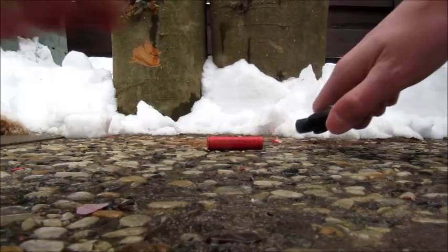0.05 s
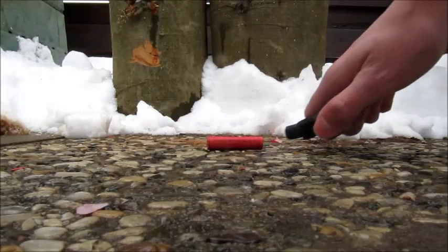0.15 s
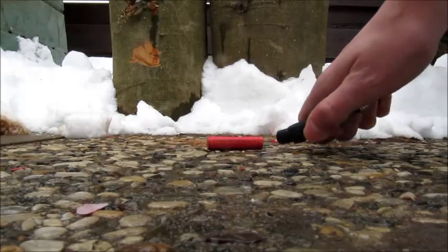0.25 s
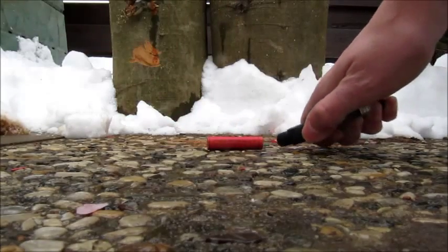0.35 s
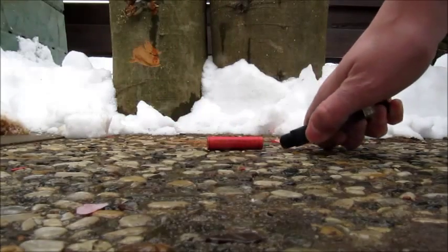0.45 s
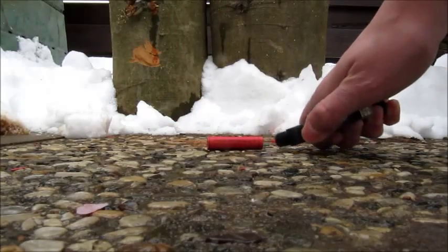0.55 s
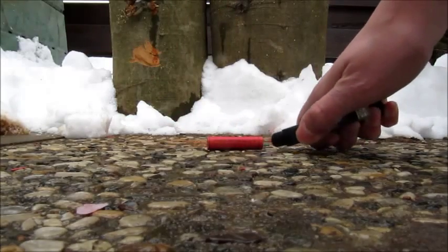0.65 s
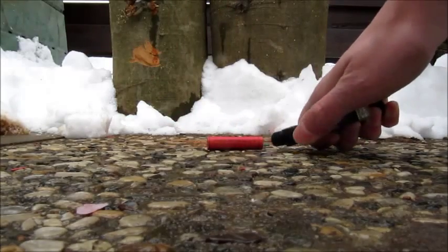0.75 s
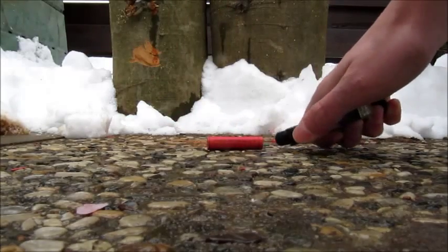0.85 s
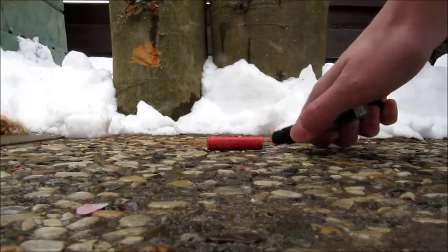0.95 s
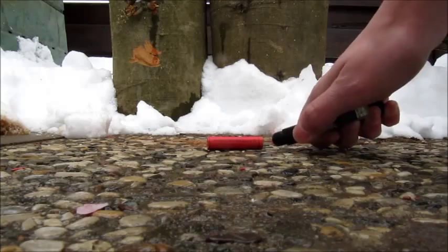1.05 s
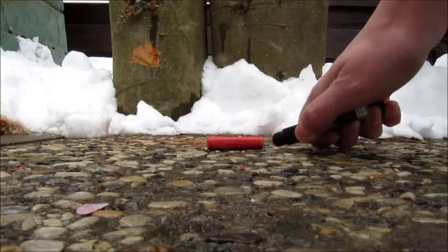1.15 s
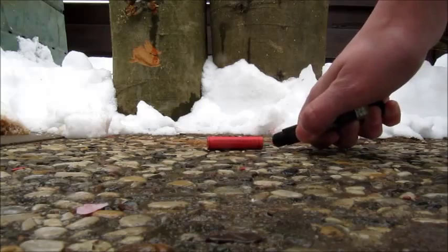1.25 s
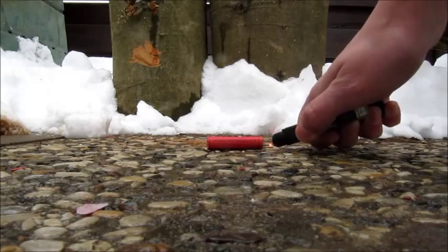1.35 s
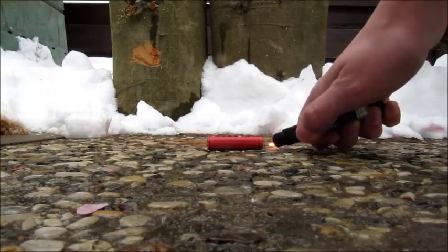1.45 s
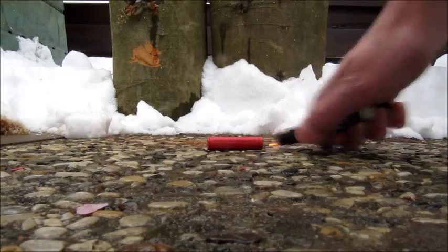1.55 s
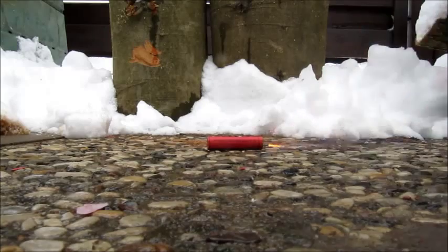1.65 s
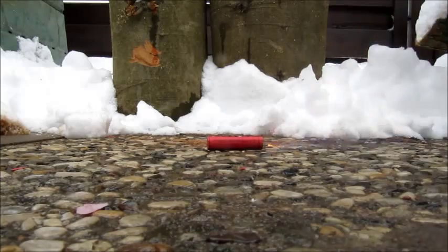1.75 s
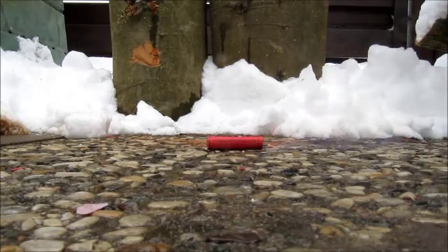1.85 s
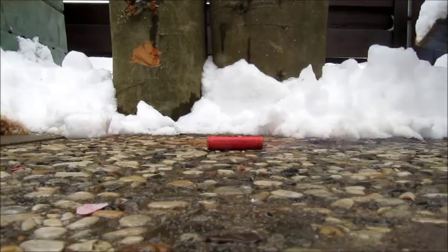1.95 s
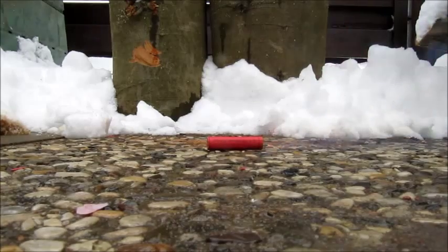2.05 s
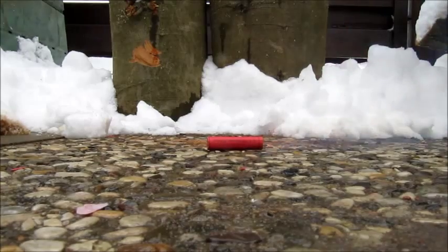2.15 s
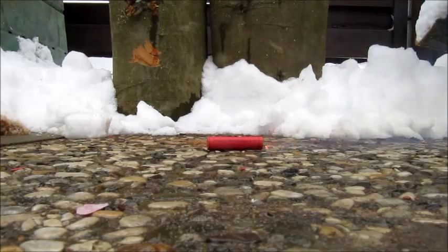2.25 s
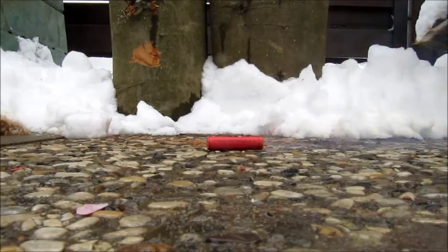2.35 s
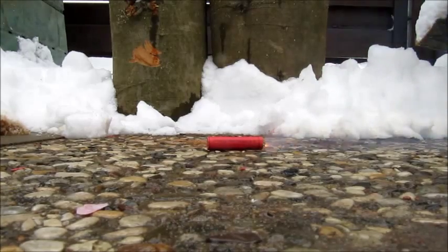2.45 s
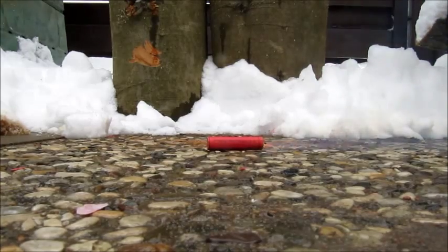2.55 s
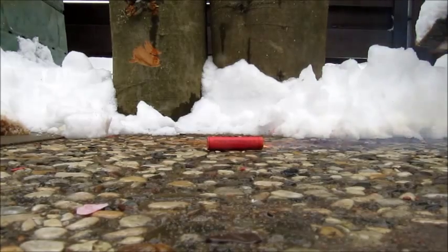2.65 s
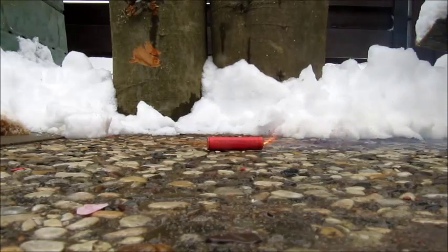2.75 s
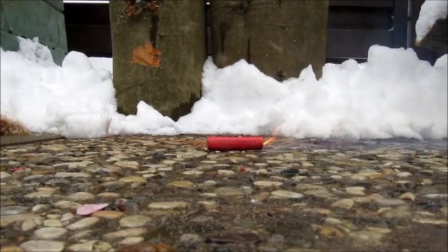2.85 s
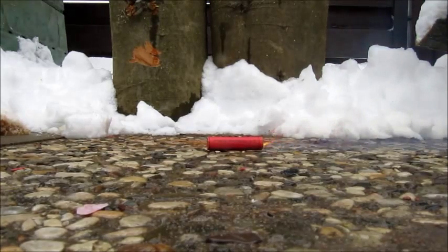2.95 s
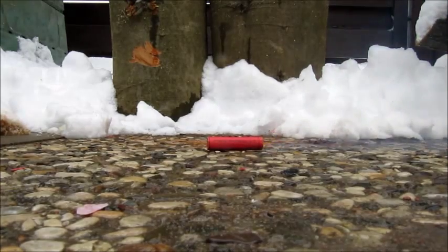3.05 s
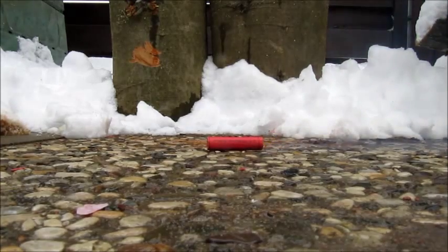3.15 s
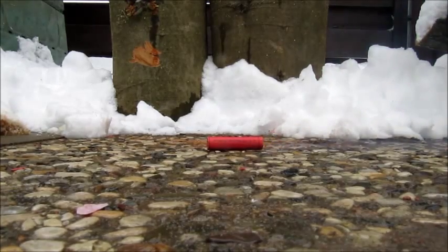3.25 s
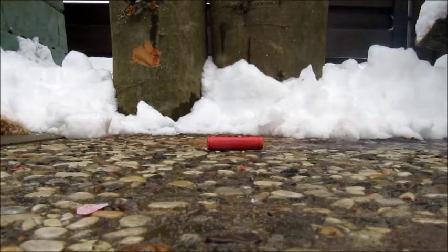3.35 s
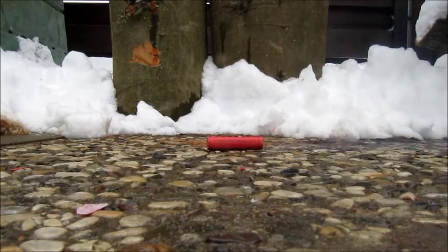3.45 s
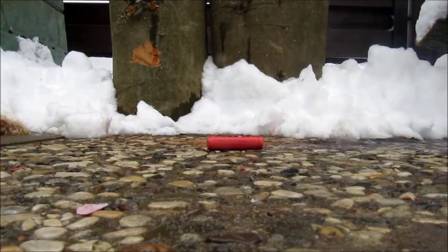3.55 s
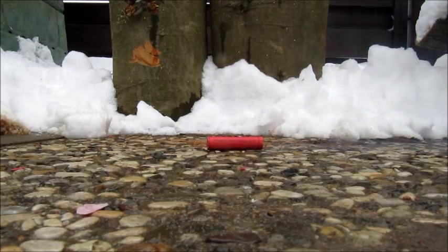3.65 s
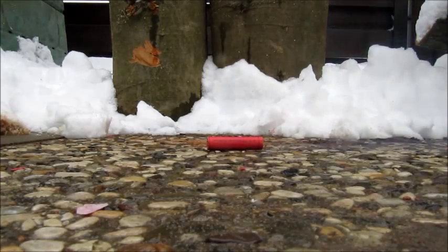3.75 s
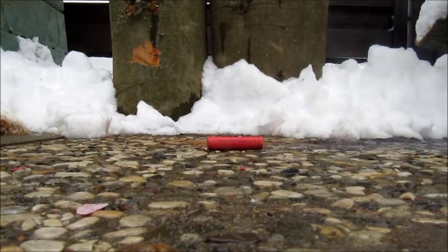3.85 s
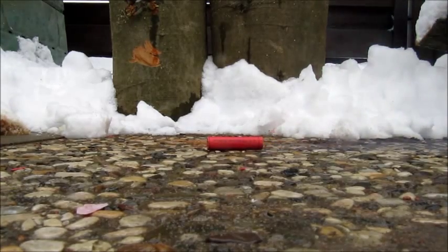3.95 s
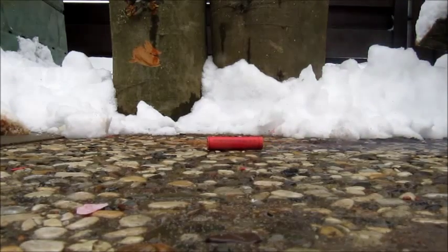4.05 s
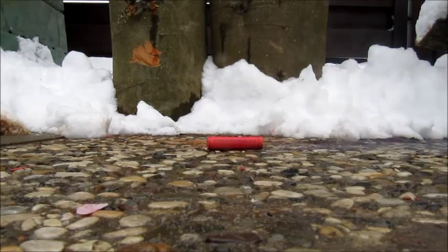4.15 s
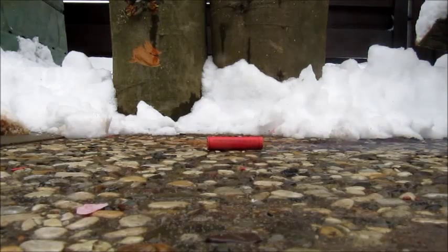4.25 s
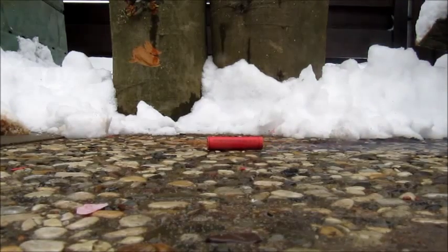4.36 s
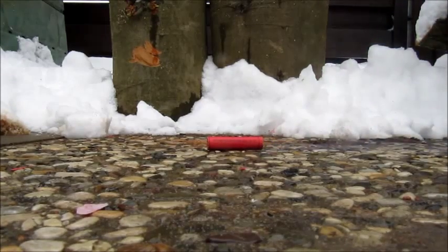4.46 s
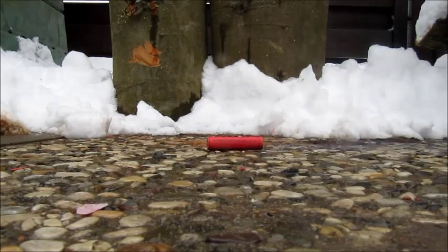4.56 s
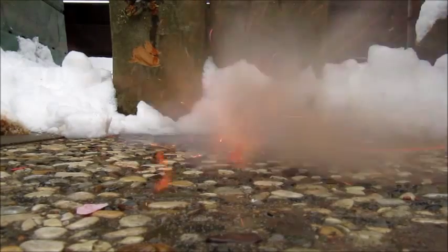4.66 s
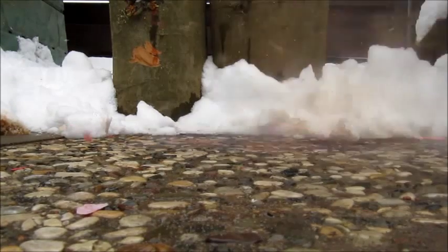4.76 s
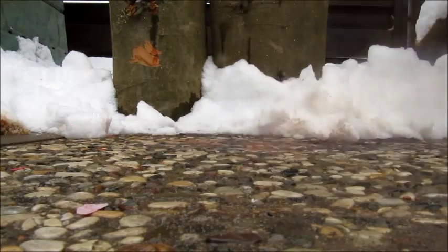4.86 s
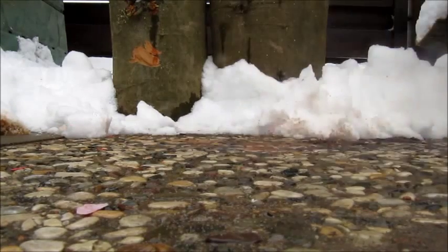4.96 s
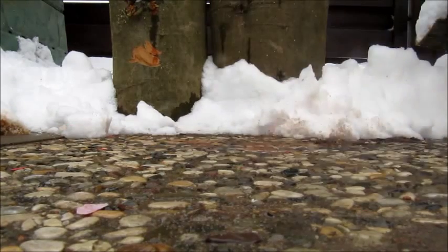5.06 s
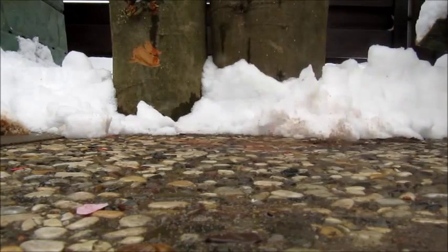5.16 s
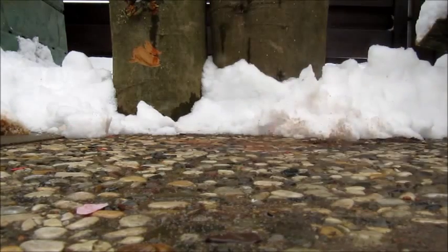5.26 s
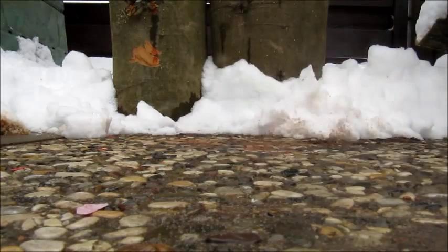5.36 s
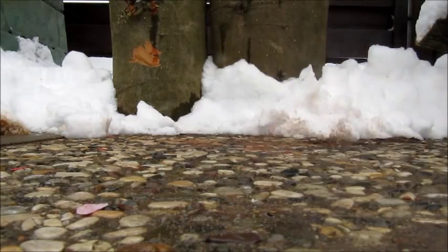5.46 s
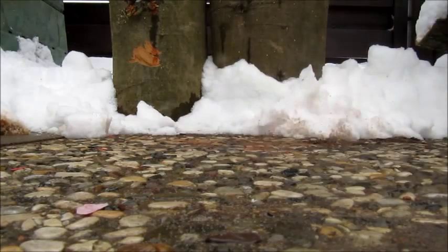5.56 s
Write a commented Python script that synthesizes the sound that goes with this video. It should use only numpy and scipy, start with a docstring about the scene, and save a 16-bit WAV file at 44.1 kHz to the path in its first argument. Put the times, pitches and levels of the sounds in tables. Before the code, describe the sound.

Lighter clicks and a sputtering, hissing fuse lead to a brief hush, a loud firecracker bang and a few ticks of falling grit.

```python
"""Firecracker in a snowy yard

Close on a pebbled path in a fenced yard, heard through a small camera's microphone, wind buffeting it.
A gas lighter hisses and snaps until it lights; the fuse sputters, burns into the tube and goes quiet.
The charge bangs, fence and houses throw it back, and grit falls on the stones.
The bang and the lighter's snaps overload the microphone and duck its gain."""
import sys
import numpy as np
from scipy import signal
from scipy.fft import rfft, irfft
from scipy.io import wavfile
from scipy.ndimage import uniform_filter1d, map_coordinates

SR = 44100
rng = np.random.default_rng(int(sys.argv[2]) if len(sys.argv) > 2 else 0)


def unload_audio(sound):
    """Save the sound as a 16-bit wav file, at the path given as the first command line argument."""
    columns = np.transpose(np.atleast_2d(sound))
    # keep every value between -1 and 1, then stretch to whole-number steps
    steps = np.round(np.clip(columns, -1, 1) * 32767)
    wavfile.write(sys.argv[1], SR, steps.astype(np.int16))


N = 247519
TIME = np.arange(N) / SR
BANG_S = 4.6863


def amp(db):
    """Decibels to gain."""
    return 10 ** (np.asarray(db) / 20)


def unit(x):
    """Scales to rms 1."""
    return x / np.sqrt(np.mean(x ** 2) + 1e-20)


def level(rows):
    """Gain over time from a curve of (seconds, dB) points."""
    return amp(np.interp(TIME, *np.transpose(rows)))


def dying(t, t60):
    """Exponential decay from t = 0, down 60 dB after t60 seconds."""
    return amp(-60 * t / t60)


def gate(on_s, attack_s, off_s, t60):
    """Straight attack, hold, exponential release."""
    return np.clip((TIME - on_s) / attack_s, 0, 1) * dying(np.maximum(TIME - off_s, 0), t60)


def settle(start_s, time_s):
    """Goes from 0 to 1 after start_s, fast at first."""
    return 1 - np.exp(-np.maximum(TIME - start_s, 0) / time_s)


def swell(s, half_s):
    """A bell-shaped rise and fall of height 1, centred on time s."""
    return np.exp(-((TIME - s) / half_s) ** 2)


def swells(rows):
    """Gain over time from a sum of bells, each given by centre, dB and half length."""
    return sum(amp(db) * swell(s, half_s) for s, db, half_s, *_ in rows)


def add(mix, s, sound):
    """Mixes a sound in at time s."""
    part = mix[max(round(s * SR), 0):][:len(sound)]
    part += sound[:len(part)]


def colour(x, points, tilt_db=0, size=4096):
    """Minimum-phase filter of unit energy through (Hz, dB) points, tilted per octave above 500 Hz."""
    octave = np.log2(abs(np.fft.fftfreq(size, 1 / SR)) + 1)
    hz, db = np.transpose(points)
    db = np.interp(octave, np.log2(hz), db) + tilt_db * np.maximum(octave, np.log2(500))
    log_gain = np.log(amp(db - db.max()))
    taps = np.fft.ifft(np.exp(np.conj(signal.hilbert(log_gain)))).real
    return signal.oaconvolve(x, taps / np.linalg.norm(taps))[:len(x)]


def resonate(x, hz, width_hz):
    """A resonance that follows the curve hz: shift down to zero, smooth twice, shift back."""
    turn = np.exp(2j * np.pi * np.cumsum(hz) / SR)
    pole = np.exp(-np.pi * width_hz / SR)
    return (turn * signal.lfilter([1], [1, -2 * pole, pole * pole], x / turn)).real


def noise(points):
    """Steady noise of rms 1 with the given spectrum."""
    return colour(rng.standard_normal(N), points)


def waver(db, per_s):
    """A gain that wanders at random by db rms, with per_s turning points a second."""
    knots = rng.standard_normal(N // 8)
    return amp(db * unit(map_coordinates(knots, [TIME * per_s], order=1)))


def grains(per_s, spread_db):
    """Random clicks of very uneven size, rms 1."""
    size = amp(spread_db * np.minimum(rng.exponential(1, N), 5))
    return unit(size * rng.choice([-1, 1], N) * (rng.random(N) < per_s / SR))


def overload(x, ceiling):
    """Flattens peaks at the ceiling with a firm knee."""
    return x / np.sqrt(np.cbrt(1 + (x / ceiling) ** 6))


def air():
    """Faint outdoor air all round the yard."""
    # Its spectrum. Each row: frequency in Hz, level in dB.
    air_spectrum = [(30, 6.5), (200, -6.5), (800, -6), (1500, -10.5), (2500, -13), (6000, -13.5),
                    (9200, -12.5), (12000, -21.5), (15700, -25)]
    return amp(-57.5) * noise(air_spectrum) * waver(db=1.1, per_s=6.5)


def wind(puff_db=10):
    """Low buffeting on the microphone; gusts have a puff at the core, and strong ones shed eddies."""
    # Strength of the breeze. Each row: time in seconds, level in dB.
    breeze_curve = [(0, -39), (.38, -42), (.5, -45.5), (.9, -41.5), (1.3, -49), (2.0, -51), (2.75, -48),
                    (2.92, -43.5), (3.17, -44.5), (3.26, -34), (3.47, -33.5), (3.57, -41), (3.9, -40.5),
                    (4.28, -60), (4.8, -49), (5.25, -51), (5.6, -45)]
    # Gusts. Each row: centre in seconds, level in dB, half length and the puff's half width in seconds.
    gusts = [(0.0505, -24, .012, 0.0022), (0.0866, -21, .03, .0018), (.1241, -32, .015, .0007),
             (.296, -44, .03, .0015), (.6, -37.5, .025, .001), (0.669, -34.5, 0.021, 0.0023),
             (.89, -41, .035, .0022), (.965, -37, 0.011, 0.0028), (1.72, -42, .012, 0.0032),
             (2.994, -38, 0.029, 0.0009), (3.262, -33, .02, .0008), (3.305, -34.5, .02, .0006),
             (3.503, -35.5, .012, 0.0014), (3.62, -40, .04, .0015), (3.722, -41, .015, .0014),
             (3.81, -39, 0.027, .0011), (3.954, -42, .015, .0017), (4.139, -37, 0.038, 0.0013),
             (4.369, -50, .03, 0.0039), (4.481, -52.5, 0.022, .003), (4.885, -34, 0.0093, .0026)]
    # Spectra of the buffeting and of the smaller, higher eddies. Each row: frequency in Hz, level in dB.
    buffet_spectrum = [(15, -2), (40, 5), (80, 1), (140, -5.5), (220, -13), (350, -23.5), (700, -42.5),
                       (2000, -71.5)]
    eddy_spectrum = [(60, -12.5), (150, 4.5), (280, -3), (450, -11), (800, -27), (2000, -59.5)]
    breeze = level(breeze_curve) * waver(db=2.5, per_s=16)
    force = np.minimum(np.hypot(breeze, swells(gusts)), amp(-31)) * waver(db=1.7, per_s=45)
    breakup = np.minimum(force / amp(-33), 1)
    eddies = amp(-6) * breakup * noise(eddy_spectrum) * waver(db=2.5, per_s=110)
    buffet = amp(-1 - 2.7 * breakup) * noise(buffet_spectrum)
    out = force * (buffet + eddies)
    t = np.arange(SR // 20) / SR
    for s, db, _, width in gusts:
        u = (t - t.mean()) / width
        puff = u * np.exp((1 - u ** 2) / 2)
        add(out, s - t.mean(), amp(db + puff_db) * puff)
    return out


def sleeve():
    """Soft cloth noise that comes and goes as the hands move near the microphone."""
    # Hand movements. Each row: centre in seconds, level in dB, half length in seconds.
    movements = [(.05, -54, .1), (.33, -57, .08), (.88, -56, .08), (1.15, -58, .08)]
    # The cloth's spectrum. Each row: frequency in Hz, level in dB.
    cloth_spectrum = [(300, 0), (900, 0), (1600, -6), (3000, -7), (6000, -13), (15000, -26)]
    return noise(cloth_spectrum) * swells(movements) * waver(db=1.5, per_s=70)


def gas(on_s, lit_s):
    """Gas hisses and softly whistles through the lighter's nozzle, dying away once it is alight."""
    # The whistle's pitch. Each row: time in seconds, frequency in Hz.
    whistle_curve = [(.14, 8570), (.25, 9000), (.41, 9500), (.55, 9800), (.9, 9260), (1.22, 9500)]
    # The hiss around the whistle. Each row: frequency in Hz, level in dB.
    nozzle_spectrum = [(500, -13.5), (2000, -19.5), (3300, -15), (4150, -5), (5100, -16), (6150, -18.5),
                       (6900, -5.5), (7800, -9.5), (8800, -1.5), (9700, -3), (10700, -9), (12000, -18.5),
                       (15700, -35)]
    whistle_hz = np.interp(TIME, *np.transpose(whistle_curve))
    whistle = unit(resonate(rng.standard_normal(N), whistle_hz, width_hz=1300))
    sag_db = -2 * settle(on_s, .2)  # the flow weakens as the nozzle cools
    flow = amp(-39.5 + sag_db) * gate(on_s, .034, lit_s, t60=.16)
    return (amp(-2.5) * noise(nozzle_spectrum) + amp(-3) * whistle) * flow * waver(db=.68, per_s=40)


def flame(lit_s, grow_s, off_s, low_db=-29.5, high_db=-20.5):
    """A fluttering flame swells and hisses more as the fuse tip heats, until the trigger is let go."""
    # The flame's low roar and the hiss above it. Each row: frequency in Hz, level in dB.
    roar_spectrum = [(150, -15), (550, -3.5), (1300, -2), (2800, 1.5), (4200, -2), (5800, -9), (6900, -6),
                     (9000, -15), (10700, -11), (15700, -34)]
    hiss_spectrum = [(2000, -23), (4000, -7.5), (5800, -11.5), (6900, -0.5), (8800, -6), (10700, 1.5),
                     (12200, -8.5), (14000, -16.5), (15700, -32)]
    heat_db = low_db + (high_db - low_db) * settle(grow_s, .07)
    heat = amp(heat_db) * gate(lit_s, .015, off_s, t60=.18)
    roar = amp(-3.5) * noise(roar_spectrum)
    hiss = amp(1) * noise(hiss_spectrum) * heat / amp(high_db)
    return heat * (roar + hiss) * waver(db=1, per_s=90)


def snaps(rows, spectrum, rattle_db, scatter_db):
    """Each snap: a hard crack, a rattle of the lighter's parts, its body's ring, scatter from the yard."""
    # Modes of the lighter's body. Each row: frequency in Hz, level in dB, t60 in seconds.
    body_modes = [(1617, -8.5, 0.02), (1792, -14, 0.028), (3010, -26.5, .09), (4100, -9, 0.035),
                  (4450, -2.5, 0.0235), (6200, -5, 0.024), (6860, -4.5, 0.035), (8000, -8, .02),
                  (8650, 0, 0.039), (9970, 2, .022)]
    out, t = np.zeros(N), np.arange(SR // 6) / SR
    tail = amp(rattle_db) * dying(t, .027) + amp(scatter_db) * dying(t, .076)
    for s, db, length, ring_db, tilt_db in rows:
        crack = rng.choice([-1., 1.], len(t)) * np.exp(-(t / length) ** 4)
        rattle = rng.standard_normal(len(t)) * tail
        ring = np.zeros(len(t))
        for hz, mode_db, t60 in body_modes:
            gain = amp(ring_db - 1 + mode_db + tilt_db * np.log2(hz / 7000))
            ring += gain * dying(t, t60) * np.sin(2 * np.pi * (hz * t + rng.random()))
        add(out, s, amp(db) * (colour(crack + rattle, spectrum, tilt_db) + ring))
    return out


def trigger():
    """Pressed, the trigger drives a spring hammer onto the igniter; let go, it clacks back."""
    # Hammer strikes and trigger returns. Each row: start in seconds, level in dB,
    # crack length in seconds, relative ring level in dB, tilt in dB per octave.
    strikes = [(.4158, 12.5, 0.0021, -15, 1.2), (1.2227, -5, 0.00043, -12, 3.5),
               (1.2236, 12, .0011, -15.5, -4)]
    releases = [(.8185, -6.5, 0.0014, -14, 0.5), (1.6147, 1.5, .0012, -14.5, -1)]
    # Spectra of a strike and of a return. Each row: frequency in Hz, level in dB.
    strike_spectrum = [(200, -23), (1000, -25), (1600, -6.5), (2200, -24.5), (2700, -12), (3400, -11.5),
                       (4300, -3.5), (5400, -10), (6300, 4.5), (8500, -0.5), (10500, -7), (13000, -15.5),
                       (15500, -27)]
    release_spectrum = [(300, -46), (1100, -38), (1750, -12), (2400, -27), (4300, -16), (5300, -20.5),
                        (6800, -6), (7700, -12), (8500, -5), (9700, 1), (11000, -11), (14500, -18),
                        (15700, -31)]
    pressed = snaps(strikes, strike_spectrum, rattle_db=-11.5, scatter_db=-36.5)
    return pressed + snaps(releases, release_spectrum, rattle_db=-9, scatter_db=-28)


def grit(bounce_s=.007, bounce_db=-23, patter_on_s=4.85):
    """Dry ticks that each bounce once, and a fine patter of specks coming down after the bang."""
    # A spark, then grit landing on the stones. Each row: start in seconds, level in dB.
    ticks = [(4.5606, -36), (5.0747, -32), (5.1478, -37), (5.318, -29.5), (5.336, -39), (5.3668, -40),
             (5.4016, -3), (5.4476, -40), (5.6, -40)]
    # Spectrum of ticks and patter. Each row: frequency in Hz, level in dB.
    tick_spectrum = [(300, -19), (2000, -14), (4400, -12), (5800, -6), (7000, -10.5), (9000, 1.5),
                     (10400, -1.5), (12200, -11), (13500, -15), (15700, -26)]
    out, t = np.zeros(N), np.arange(SR // 16) / SR
    decay = dying(t, .011) + amp(-35) * dying(t, .09)
    for s, db in ticks:
        tick, bounce = rng.standard_normal((2, len(t))) * decay
        add(out, s, amp(db) * tick)
        add(out, s + bounce_s, amp(db + bounce_db) * bounce)
    patter_level = amp(-63 + 10 * swell(5.36, half_s=.08)) * (TIME > patter_on_s)
    patter = grains(per_s=140, spread_db=4.6) * patter_level
    return colour(out + patter, tick_spectrum)


def fuse(catch_s=1.6, enters_s=2.57, plug_s=4.374, vent_lead_s=.012):
    """Powder grains pop in a fluttering flame; the hiss narrows to a jet as the fire enters the tube."""
    # How fiercely the fuse burns. Each row: time in seconds, level in dB.
    burn_curve = [(1.66, -22.5), (1.86, -18), (2.1, -18.5), (2.58, -20), (2.9, -22), (3.11, -22.5),
                  (3.33, -28.5), (3.66, -23.5), (3.95, -27), (4.37, -27.5)]
    # Spits from richer spots of powder. Each row: centre in seconds, level in dB, half length in seconds.
    flares = [(2.17, -21, .025), (2.228, -16, .024), (2.64, -24, 0.039)]
    # Spectra of the open fuse, the jet and the thin, bright spits. Each row: frequency in Hz, level in dB.
    sputter_spectrum = [(150, -28), (380, -19.5), (550, -12.5), (730, -19), (1000, -13.5), (2500, -10),
                        (5000, -8), (7000, -4.5), (8350, -3.5), (8800, 1.5), (9030, -3), (9270, -1),
                        (9700, -2.5), (10500, -6), (11300, -13), (12300, -20), (13300, -18), (15700, -30)]
    jet_spectrum = [(150, -33), (550, -25.5), (730, -29), (1200, -24.5), (2500, -18.5), (4000, -15),
                    (6000, -9.5), (7500, -4.5), (8400, -3), (8800, 1.5), (9030, -2.5), (9270, 2), (9500, 0),
                    (10100, -0.5), (11300, -4.5), (12200, -13.5), (13400, -18.5), (14200, -28.5),
                    (15700, -38)]
    spit_spectrum = [(1200, -22), (2500, -6), (4200, -4), (6000, -5), (9000, 1), (11000, -9), (15500, -28)]
    burning = gate(catch_s, .073, plug_s, t60=.044)
    # Past the tube's plug the hiss drops and smoulders; the tube vents an instant before it bursts.
    smoulder = amp(-20) * gate(plug_s, .01, plug_s, t60=1.7) * (TIME < BANG_S)
    vent = amp(-31) * gate(BANG_S - vent_lead_s, .006, BANG_S, t60=.005)
    burn = level(burn_curve) * (burning + smoulder) + vent
    flutter = waver(db=.72, per_s=22) * waver(db=.84, per_s=60) * waver(db=.82, per_s=300)
    sputter = .81 * rng.standard_normal(N) + .64 * grains(per_s=5000, spread_db=3.5)
    jet = .96 * rng.standard_normal(N) + .55 * grains(per_s=4000, spread_db=2.5)
    depth = settle(enters_s, .33)
    hiss = np.sqrt(1 - depth) * colour(sputter, sputter_spectrum)
    hiss += np.sqrt(depth) * colour(jet, jet_spectrum)
    spits = noise(spit_spectrum) * swells(flares)
    return flutter * (burn * hiss + spits)


def blast(db, rise_s, t60, tilt_db):
    """One arrival of the bang: dense scatter that rises and dies away."""
    # The bang's spectrum. Each row: frequency in Hz, level in dB.
    blast_spectrum = [(40, -6), (170, -4.5), (330, -12), (560, -13), (780, -2), (1250, -3.5), (1750, -1),
                      (2500, -1.5), (4000, -3.5), (5700, -8), (9300, -4), (11500, -18), (15500, -26.5)]
    t = np.arange(SR * 2 // 3) / SR
    burst = rng.standard_normal(len(t)) * (1 - np.exp(-t / rise_s)) * dying(t, t60)
    return amp(db) * colour(burst, blast_spectrum, tilt_db)


def corner_ring(x):
    """The corner between path and fence rings with the sound that passes through it."""
    # Its resonances. Each row: frequency in Hz, level in dB, nominal t60 in seconds.
    corner_modes = [(1685, -3.5, .05), (1840, -7, .05), (1970, -6, 0.052), (2368, -6, .045),
                    (2460, -6.5, 0.057), (2651, -5, 0.036), (3170, -6.5, .04), (3849, -4.5, .04)]
    return sum(amp(db) * signal.lfilter(*signal.iirpeak(hz, hz * t60 / 2.7, SR), x)
               for hz, db, t60 in corner_modes)


def bang(shock_db=17, shock_s=.0008, shock_lead_s=.0006):
    """The charge bursts: a shock front, scatter from the stones, echoes from walls near and far."""
    # Echoes from fence and houses. Each row: delay in seconds, level in dB.
    echoes = [(0.0219, 2.5), (0.0472, 10), (.077, -7.5), (.083, -3.5), (.161, -21), (.211, -28),
              (.338, -43.5)]
    # The bang rolling back from afar. Each row: centre in seconds, level in dB, half length in seconds.
    rolls = [(5.0, -55, .13), (5.385, -51, .06), (5.49, -56, .13)]
    # The spectrum of that roll. Each row: frequency in Hz, level in dB.
    roll_spectrum = [(100, 0.5), (400, 2), (1100, 0), (1700, -0.5), (2400, -13), (5000, -26), (9000, -20),
                     (15000, -40)]
    out, t = np.zeros(N), np.arange(SR // 10) / SR
    add(out, BANG_S, blast(db=19.5, rise_s=.00045, t60=.07, tilt_db=0))  # scatter from the stones
    add(out, BANG_S + .0077, blast(db=14, rise_s=.1, t60=.05, tilt_db=-5.5))  # dull boom
    add(out, BANG_S + .0137, blast(db=-5.5, rise_s=.05, t60=.28, tilt_db=-1.2))  # yard reverberation
    for delay, db in echoes:  # the longer its path, the more an echo is smeared and dulled
        add(out, BANG_S + delay, blast(db, rise_s=.029 * delay, t60=.6 * delay, tilt_db=2.3 - 28 * delay))
    out += noise(roll_spectrum) * swells(rolls) * waver(db=1.8, per_s=22)
    out += amp(1) * corner_ring(out)
    u = t / shock_s
    shock = (1 - u) * np.exp(-u) * np.minimum(u, 1) ** 2  # overpressure, then suction
    add(out, BANG_S - shock_lead_s, -amp(shock_db) * shock)
    return out


def scene(lit_s=1.223):
    """Everything that reaches the microphone, in mono."""
    outdoors = air()
    lighter = trigger() + gas(on_s=.135, lit_s=lit_s) + flame(lit_s, grow_s=1.365, off_s=1.617)
    firecracker = fuse() + bang() + grit()
    return (outdoors + lighter + firecracker + wind() + sleeve())[None]


def record(dry):
    """The microphone overloads; gain control clamps fast and recovers slowly; the converter clips."""
    # The microphone's top end. Each row: frequency in Hz, gain in dB.
    treble_response = [(9500, -1.5), (12000, -1), (15500, -5)]
    threshold_db, attack_s, recovery_db_per_s, edge_hz = -13.6, .0009, 11, 15950
    fast_sr = 2 * SR
    x = overload(signal.resample_poly(dry[0], 2, 1), ceiling=2.975)
    power_db = 10 * np.log10(abs(uniform_filter1d(x ** 2, size=88)) + 1e-12)
    recovery_db = recovery_db_per_s * np.arange(len(x)) / fast_sr
    held_db = np.maximum.accumulate(power_db + recovery_db) - recovery_db
    over_db = np.maximum(held_db - threshold_db, 0)
    lag = np.exp(-1 / (attack_s * fast_sr))
    duck_db = signal.lfilter([1 - lag], [1, -lag], over_db)
    x = overload(x / amp(duck_db), ceiling=.63)  # the converter clips what slips by
    x = signal.resample_poly(x, 1, 2)
    treble_db = np.interp(np.fft.rfftfreq(N, 1 / SR), *np.transpose(treble_response))
    x = irfft(rfft(x) * amp(treble_db), N)
    lowpass = signal.firwin(255, edge_hz, window=("kaiser", 9), fs=SR)
    return signal.oaconvolve(x, lowpass, "same")[None]


dry = scene()
out = record(dry)
unload_audio(out)
```